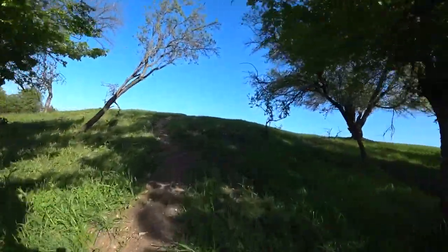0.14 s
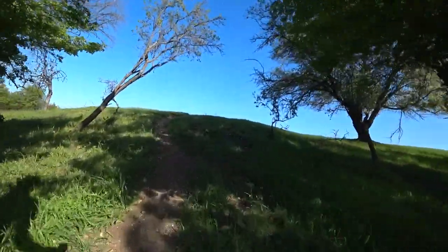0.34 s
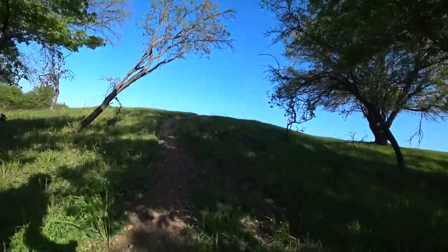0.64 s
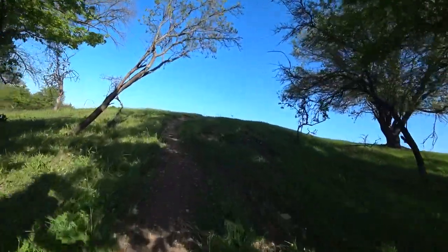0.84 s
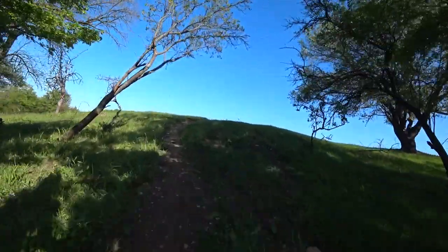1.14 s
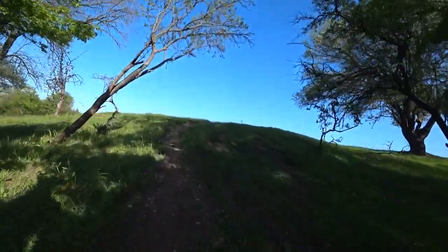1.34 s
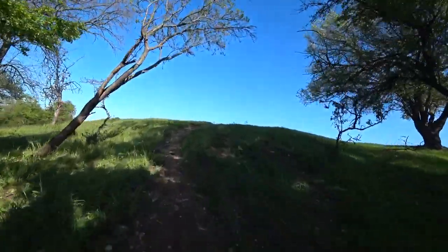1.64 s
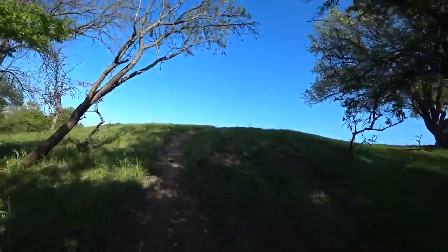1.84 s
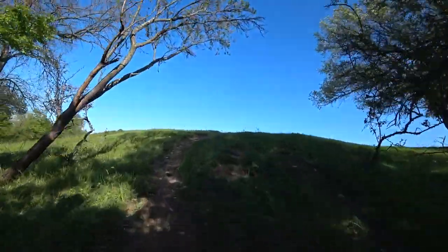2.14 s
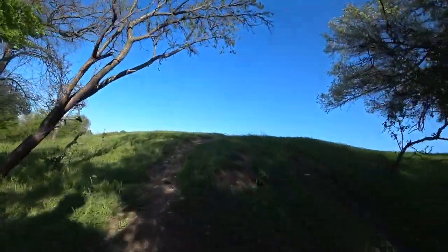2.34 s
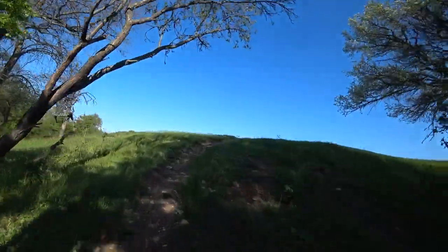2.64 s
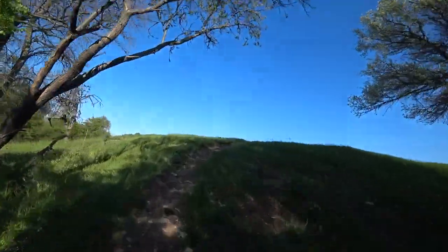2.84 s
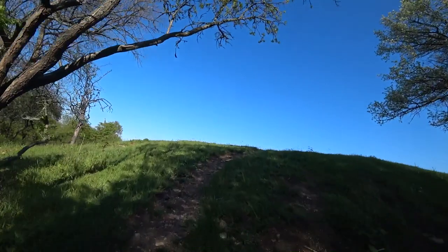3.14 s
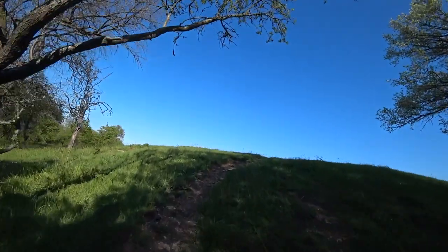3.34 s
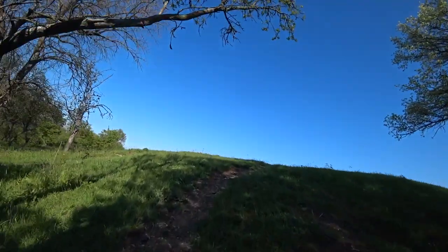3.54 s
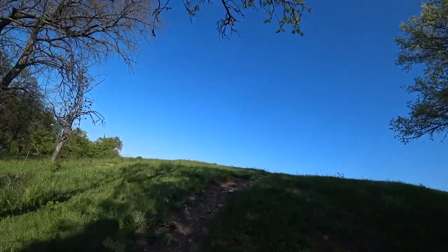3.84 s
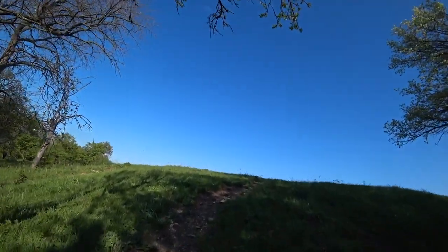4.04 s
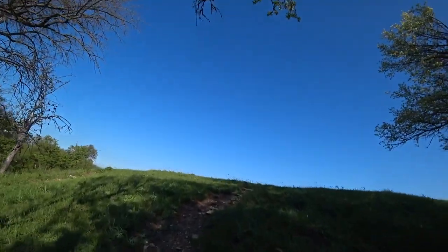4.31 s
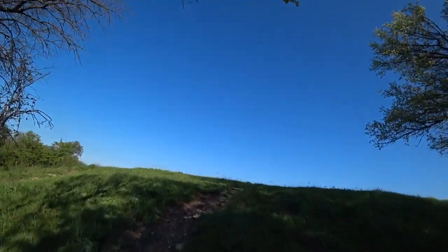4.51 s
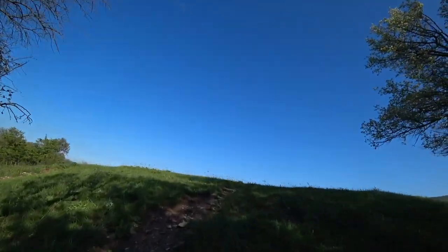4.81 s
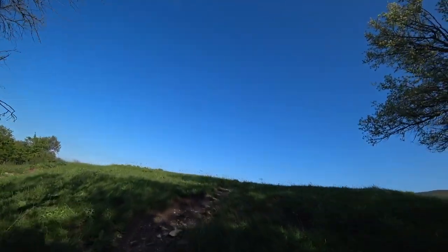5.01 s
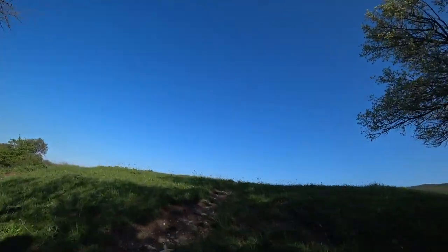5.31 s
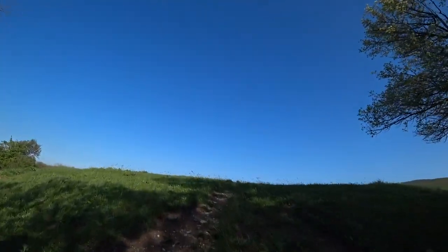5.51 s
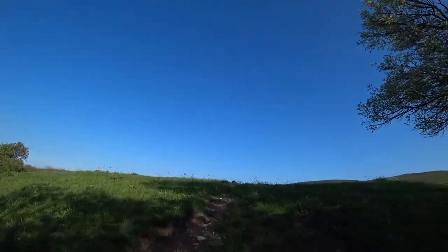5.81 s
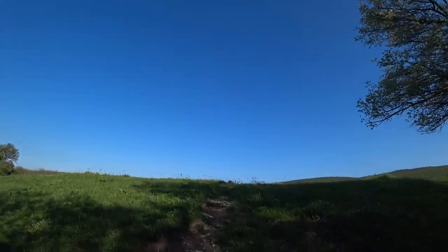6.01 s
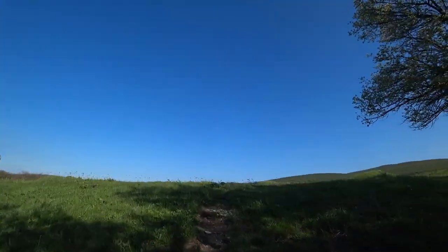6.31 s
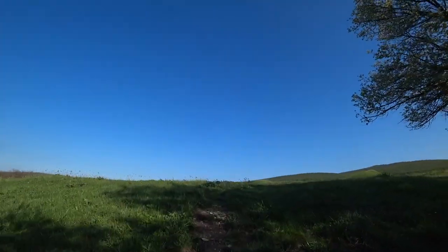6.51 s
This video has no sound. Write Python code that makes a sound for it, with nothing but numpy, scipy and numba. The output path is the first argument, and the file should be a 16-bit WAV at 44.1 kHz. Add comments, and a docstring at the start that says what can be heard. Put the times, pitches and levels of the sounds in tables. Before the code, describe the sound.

Close, quick footsteps crunch soil, grit and grass on an outdoor path, with dry twig and pebble snaps. Leaves and air hiss softly behind. After two seconds, uneven wind gusts buffet the small carried stereo microphone in dull, fluttering bursts, partly covering the steps and brief bird chirps. The wind weakens after five seconds, leaving crunches, clicks and faint chirping.

```python
"""On a dirt path between grass and trees, a runner carries a small stereo camera. Behind everything, leaves and
air are bands of noise that swell together and flicker alone. Birds are gliding tones; lone puffs and gusts at
the microphone ports are ringing pops and eddy noise. Twigs and pebbles snap as clicks rung through two
resonances. Footfalls crunch soil, grit and grass: random breaking grains, shaped by the weight that comes on
and eases off."""
import sys
import numpy as np
from scipy import signal
from scipy.fft import next_fast_len
from scipy.io import wavfile
from scipy.ndimage import uniform_filter1d
from numba import njit

SR = 44100
rng = np.random.default_rng(int(sys.argv[2]) if len(sys.argv) > 2 else 0)


def int16_out(signal):
    """Quantize to a 16-bit WAV file."""
    q = np.round(np.clip(np.atleast_2d(signal).T, -1, 1) * 32767)
    wavfile.write(sys.argv[1], SR, q.astype(np.int16))


N = 293706

# Relative spectral density of far leaves and air: pitch_hz, density_db
WOODS_SPECTRUM = [(25, -16), (138, -5.5), (269, -6.5), (298, -7), (385, -21), (472, 0), (609, 1), (893, 1),
                  (1500, 3), (2500, -5), (4100, -6.5), (5210, -8.5), (10100, -21.5), (11200, -57)]
# Correlation of the leaves between left and right: pitch_hz, likeness_0_to_1
WOODS_LIKENESS = [(60, 1), (300, 0.57), (2500, 0.13), (6000, 0.52)]
# Bird whistles, before waver and flutter: start_s, length_s, first_hz, last_hz, level_db
WHISTLES = [(1.732, 0.1, 4920, 4570, -67), (2.686, 0.12, 4220, 2840, -51), (2.873, 0.034, 3700, 3700, -65),
            (2.939, 0.025, 3730, 3680, -64), (3.068, 0.016, 3120, 3130, -43),
            (3.094, 0.016, 5080, 2320, -46), (3.261, 0.044, 2270, 2060, -54.5),
            (3.344, 0.013, 4820, 7300, -55), (3.351, 0.0059, 4330, 6040, -45.5),
            (3.4, 0.0079, 5330, 7800, -64), (3.401, 0.0086, 4680, 6550, -49.5),
            (3.467, 0.012, 3130, 2020, -53), (3.547, 0.013, 3840, 5460, -54.5),
            (3.555, 0.011, 4020, 3910, -46), (3.568, 0.0113, 3830, 3020, -51),
            (3.569, 0.033, 3010, 3390, -46), (3.603, 0.017, 3000, 2050, -54),
            (3.72, 0.028, 6800, 7100, -57.5), (3.756, 0.029, 6950, 6770, -59),
            (6.225, 0.028, 2320, 2500, -60), (6.343, 0.061, 2470, 2570, -66),
            (6.604, 0.042, 2530, 2450, -56)]
# A second bird's throbbing, falling chirps, before throb and fade: start_s, length_s, level_db
CHIRP_CALLS = [(6.303, 0.034, -52), (6.429, 0.044, -50.5), (6.56, 0.038, -58)]
# Lone puffs of air on the ports, nominal peaks: time_s, peak_db
AIR_PUFFS = [(0.925, -54.5), (1.61, -56), (1.744, -54), (1.781, -48.5)]
# Mean strength of the wind on the ports, before flutter: time_s, level_db
GUST_STRENGTH = [(1.74, -77), (1.8, -54.5), (1.9, -49.5), (1.97, -39.5), (2.0, -37), (2.06, -38.5),
                 (2.145, -39), (2.2, -48), (2.235, -42.5), (2.255, -35), (2.305, -39), (2.345, -31.5),
                 (2.368, -39), (2.4, -33), (2.47, -38.5), (2.594, -44.5), (2.645, -38.5), (2.665, -31),
                 (2.7, -34), (2.78, -51.5), (2.82, -47.5), (2.888, -39.5), (2.975, -46.5), (3.005, -39.5),
                 (3.07, -38.5), (3.165, -43.5), (3.21, -31), (3.225, -37), (3.25, -35.5), (3.265, -43.5),
                 (3.325, -41.5), (3.385, -46), (3.405, -35.5), (3.435, -37), (3.462, -38.5), (3.55, -42),
                 (3.68, -43), (3.79, -46), (4.27, -54.5), (4.33, -40), (4.375, -48.5), (4.445, -38.5),
                 (4.49, -40.5), (4.56, -34.5), (4.61, -40), (4.7, -42.5), (4.755, -48.5), (4.88, -47),
                 (4.92, -41), (4.99, -42.5), (5.04, -54), (5.13, -47.5), (5.19, -58), (5.28, -44),
                 (5.448, -64), (5.6, -54), (5.76, -74), (5.84, -49.5), (5.89, -50.5), (6.2, -53.5),
                 (6.321, -69), (6.66, -52.5)]
# Mean strength of the low thumps under the gusts, before flutter: time_s, level_db
THUMP_STRENGTH = [(1.72, -94), (1.85, -62), (2.1, -64.5), (2.6, -52), (3.1, -65.5), (3.75, -49.5),
                  (4.58, -63.5), (4.67, -40.5), (4.76, -62), (6.66, -66)]
# Snapping twigs and pebbles, peaks before panning:
# time_s, crack_peak_db, crack_pitch_hz, knock_peak_db, left_minus_right_db
TWIG_SNAPS = [(0.121, -48, 3000, -48, 2), (0.153, -39, 2500, -34.5, 2), (0.195, -53, 2500, -45, 5),
              (0.2296, -53, 2400, -38, 4), (0.2731, -36, 3060, -35.5, 2), (0.525, -39, 4400, -81, 3),
              (1.078, -34.5, 3750, -58, 2), (1.139, -42, 3310, -67, 1), (1.3593, -45, 2500, -42, 2),
              (1.403, -65, 2030, -31, 4), (1.413, -55, 2500, -42, 0), (1.61, -47, 6100, -47, 4),
              (1.895, -57, 3340, -25, 1.5), (2.019, -31, 2400, -44, 3.5), (2.0998, -39, 3840, -50, 1),
              (2.532, -39, 2500, -34, 2), (2.829, -39.5, 4970, -42.5, 3), (2.985, -33, 5800, -37, 5),
              (3.128, -57, 2200, -35, 2), (3.949, -25, 5570, -47, 4), (3.965, -38, 5000, -42, 8),
              (4.1045, -29, 6330, -34, -13.5), (4.167, -57, 2200, -38.5, 3), (4.2127, -50, 2200, -33, 5),
              (4.2137, -30, 5460, -44, 0), (4.2149, -17, 5460, -26, 1.5), (4.215, -26, 7060, -47, 3),
              (4.2232, -32, 4800, -37, 6), (4.2517, -23, 8150, -28.5, -11), (4.362, -49, 5000, -41.5, 2),
              (4.7914, -39, 2220, -34.5, 5), (4.824, -31.5, 4770, -32.5, 2), (4.8534, -36, 2260, -32.5, 4),
              (5.1579, -20.5, 2640, -28.5, 3), (5.3504, -38, 2050, -48, 5), (5.3622, -53, 2350, -28.5, 4),
              (5.4088, -38.5, 2040, -39.5, 5), (5.5, -43, 2600, -45, 2), (5.68, -34.5, 4550, -40, -1),
              (5.709, -37.5, 2090, -62, 2), (5.9227, -56, 2200, -35, 0), (5.93, -36, 3040, -25.5, 3),
              (5.9763, -39, 2540, -37, 1), (6.049, -41.5, 4000, -59, 0), (6.4995, -45, 3500, -37, 1.5),
              (6.5298, -44, 4200, -26, 2), (6.6202, -36, 4260, -59, 1), (6.636, -32, 3400, -42, 1.5),
              (6.64, -30, 3240, -59, 1.5)]
# Feet on the ground, some dragging, before stick and slip:
# start_s, time_scale_s, grit_level_db, brightness_db_per_octave
FOOTFALLS = [(-0.03, 0.15, -55, 3), (0.079, 0.077, -55.5, 0), (0.12, 0.052, -58.5, -1),
             (0.207, 0.05, -57.5, -0.5), (0.27, 0.056, -67.5, 4), (0.521, 0.035, -53.5, 5.5),
             (0.751, 0.038, -54, -6), (1.075, 0.02, -59, -1.5), (1.366, 0.036, -52, -5),
             (1.435, 0.065, -64, -3.5), (1.657, 0.062, -65, -6), (1.88, 0.06, -53.5, -3),
             (2.12, 0.051, -63, 6), (2.454, 0.086, -51.5, -5), (2.979, 0.025, -55, 13.5),
             (2.986, 0.12, -54, -3), (3.608, 0.075, -57.5, -6.5), (3.938, 0.025, -52.5, 7.5),
             (4.081, 0.058, -64, 12), (4.201, 0.059, -49.5, -2.5), (4.422, 0.17, -66.5, 2),
             (4.754, 0.13, -56.5, -1.5), (5.12, 0.12, -63.5, 13.5), (5.334, 0.058, -54.5, -3.5),
             (5.58, 0.076, -60, -0.5), (5.662, 0.12, -58, 2), (5.915, 0.056, -58, -7.5),
             (6.029, 0.037, -61.5, -1), (6.476, 0.047, -50.5, -5.5), (6.534, 0.064, -60.5, -5),
             (6.6, 0.08, -61.5, -3)]

WOODS_RMS_DB = -60
GLIDE_BEND_PER_S = 5.3  # the longer a whistle, the more it lingers on its first pitch, then glides ever faster
CHIRP_HZ, CHIRP_FALL_HZ, CHIRP_BEND = 5250, 1900, 3.0
CHIRP_THROB_HZ, CHIRP_THROB_SHARE, CHIRP_FADE_DB = 165, .6, 12
# Gusts stronger than the reference shed smaller, higher eddies
EDDY_HZ, EDDY_REF_DB, EDDY_OCT_PER_DB = 534, -41.5, 0.082
# As the air slows the eddies grow and their pitch sinks: start, rate, greatest depth
EDDY_SAG_FROM_S, EDDY_SAG_OCT_PER_S, EDDY_SAG_OCT = 3.86, 0.42, 0.11
PORT_HZ = 1275  # low-pass corner of the port opening
PORT_TURN_RAD = 2.15  # phase the stereo matrix puts between left and right for wind entering one port
# What crushed ground rings with: centre and width
SOIL_HZ, SOIL_WIDTH_HZ = 1150., 1000.
GRIT_HZ, GRIT_WIDTH_HZ = 3500., 3400.
GRASS_HZ, GRASS_WIDTH_HZ = 6500., 4200.
GRASS_DB = -5  # offset of the swish from the slope through soil and grit
# Shares of a step's time scale: weight coming on, then the e-fold time of crumbling away
PRESS_SHARE, CRUMBLE_SHARE = 0.41, 0.65
TOP_HZ = 11250
SIDES = np.array([[1], [-1]])  # left, right


def undb(db):
    """Decibel definition: amplitude ratio from a level."""
    return 10 ** (np.asarray(db) / 20)


def level(x, db):
    """Root-mean-square normalisation to a given level."""
    return x * undb(db) / np.sqrt(np.mean(x ** 2))


def noise():
    """White noise: independent normal samples of unit power."""
    return rng.standard_normal(N)


@njit
def svf(x, hz, damp):
    """State-variable resonance: band-pass of moving centre, gain 1 there; damp = width over centre."""
    y, band_state, low_state = np.empty(len(x)), 0., 0.
    for i in range(len(x)):
        g = np.tan(np.pi * hz[i] / SR)
        v = (band_state + g * (x[i] - low_state)) / (1 + g * (g + damp))
        band_state = 2 * v - band_state
        low_state = low_state + 2 * g * v
        y[i] = damp * v
    return y


def moving_band(x, hz, damp):
    """Cascaded resonance: two equal band-passes in series steepen the skirts."""
    return svf(svf(x, hz, damp), hz, damp)


def band(x, hz, width_hz):
    """Fixed cascaded resonance, set by its centre and the width of each stage."""
    return moving_band(x, np.full(len(x), float(hz)), width_hz / hz)


def walk(rate):
    """Slewed random process: levels held 1 / rate s and averaged twice, spread near 1."""
    hold = int(SR / rate)
    steps = np.repeat(rng.standard_normal(N // hold + 1), hold)
    slewed = uniform_filter1d(uniform_filter1d(steps, hold), hold)
    return slewed[:N] * np.sqrt(2)


def place(x, pan_db, wide):
    """Level-difference panning; an unlike share reaches each side by slightly later paths."""
    late = np.roll(x, 23) - np.roll(x, 61)
    return undb(SIDES * pan_db / 2) * x + wide * late * SIDES


def glide_tone(pitch_hz):
    """Frequency modulation: phase is the running sum of the instantaneous pitch."""
    return np.sin(2 * np.pi * np.cumsum(pitch_hz) / SR)


def grains(per_s, spread_db):
    """Random impulse process of breaking particles: most small, a few large."""
    when, sign, size = rng.random(N), rng.standard_normal(N), rng.exponential(1, N)
    return (when < per_s / SR) * sign * undb(np.minimum(spread_db * size, 16))


def woods():
    """Superposed band noise of far leaves and air: half-octave bands swell together and flicker alone."""
    leaves, swell = 0, walk(4.46)
    spectrum_hz, spectrum_db = np.transpose(WOODS_SPECTRUM)
    likeness_hz, likeness = np.transpose(WOODS_LIKENESS)
    for hz in 21 * 2 ** np.arange(0, 9.3, .5):
        mid = band(noise(), hz, hz * .7)
        side = band(noise(), hz, hz * .7)
        db = np.interp(np.log(hz), np.log(spectrum_hz), spectrum_db)
        db = db + .7 * swell + 2.2 * walk(9)
        alike = np.clip(np.interp(np.log(hz), np.log(likeness_hz), likeness), 0, 1)
        leaves = leaves + undb(db) * (np.sqrt(1 + alike) * mid + np.sqrt(1 - alike) * side * SIDES)
    # a thin wavering hiss high in the treble
    hiss = np.array([band(noise(), 9840.0, 1400.0) for _ in range(2)])
    hiss = level(hiss, -76.5) * undb(0.43 * walk(11.0))
    return level(leaves, WOODS_RMS_DB) * undb(0.4 * SIDES) + hiss


def birds():
    """Frequency-modulated whistles, slightly unsteady, trailed by a faint smear scattered from the trees."""
    calls, waver, flutter = np.zeros(N), 0.014 * walk(500), undb(2.5 * walk(250))
    for start, length, first_hz, last_hz, db in WHISTLES:
        u = np.arange(0, 1, 1 / (length * SR))  # share of the call elapsed
        i = int(start * SR)
        pitch = first_hz + (last_hz - first_hz) * u ** (1 + GLIDE_BEND_PER_S * length)
        steadiness = min(1, (0.038 / length) ** 2)  # long whistles are held steady
        pitch = pitch * (1 + waver[i:i + len(u)] * steadiness)
        calls[i:i + len(u)] += undb(db) * np.sin(np.pi * u) ** 0.38 * glide_tone(pitch)
    for start, length, db in CHIRP_CALLS:
        u = np.arange(0, 1, 1 / (length * SR))
        i, fall = int(start * SR), u ** CHIRP_BEND
        throb = 1 - CHIRP_THROB_SHARE * np.cos(2 * np.pi * CHIRP_THROB_HZ * u * length)
        pitch = (CHIRP_HZ - CHIRP_FALL_HZ * fall) * (1 + waver[i:i + len(u)])
        envelope = undb(db - CHIRP_FADE_DB * fall) * throb * np.sin(np.pi * u) ** 0.76
        calls[i:i + len(u)] += envelope * glide_tone(pitch)
    t = np.arange(int(.15 * SR)) / SR
    trees = rng.standard_normal((2, len(t))) * np.exp(-t / 0.05) * undb(-39)
    smear = signal.fftconvolve(calls[None], trees, axes=1)[:, :N]
    return place(calls * flutter, 7.3, 0.043) + smear


def puffs():
    """Impulse response of a damped resonance: each puff is a dull pop of two or three cycles."""
    impulses = np.zeros(N)
    for s, db in AIR_PUFFS:
        impulses[int(s * SR)] = undb(db)
    pop = band(impulses, 253.0, 250.0)
    return place(pop * impulses.max() / np.abs(pop).max(), 1.0, 0.1)


def wind():
    """Eddy shedding at the ports: noise round a wandering pitch, in quick puffs, over lower thumps."""
    t = np.arange(N) / SR
    gust_db = np.interp(t, *np.transpose(GUST_STRENGTH))
    thump_db = np.interp(t, *np.transpose(THUMP_STRENGTH))
    hz = EDDY_HZ * 2 ** (EDDY_OCT_PER_DB * np.maximum(gust_db - EDDY_REF_DB, 0))
    hz = hz * 2 ** -np.clip(EDDY_SAG_OCT_PER_S * (t - EDDY_SAG_FROM_S), 0, EDDY_SAG_OCT)
    hz = hz * np.exp(0.099 * walk(24.85))
    gust_db = gust_db + 1.5 * np.tanh(walk(40))  # the air flutters about its mean strength

    small = level(moving_band(noise(), hz, 1.3), -1.97)
    small = small * undb(4.7 * np.tanh(walk(90)))
    large = level(moving_band(noise(), 0.69 * hz, 0.85), -4.5)
    large = large * undb(5.9 * np.tanh(walk(60)))
    eddy = (small + large) * undb(gust_db)
    # eddies smaller than the port opening cancel out
    eddy = signal.sosfilt(signal.butter(5, PORT_HZ, fs=SR, output="sos"), eddy)
    analytic = signal.hilbert(eddy, next_fast_len(N))[:N]
    port = np.real(analytic * np.exp(-.5j * PORT_TURN_RAD * SIDES))

    # lower eddies are independent on the two sides; thumps are partly alike
    lower = np.array([level(moving_band(noise(), 0.52 * hz, 1.44), -7.0) for _ in range(2)])
    mid = level(band(noise(), 124.0, 266.0), 0)
    side = level(band(noise(), 175.0, 220.0), -1.5)
    thump = undb(thump_db + 4.5 * np.tanh(walk(15))) * (mid + side * SIDES)
    return port * undb(0.4 * SIDES) + undb(gust_db) * lower + thump


def snaps():
    """Impulsive excitation: a click with a few ms of splinters rings a crack and a knock resonance."""
    out, t = np.zeros((2, N)), np.arange(int(.012 * SR)) / SR
    for s, crack_db, crack_hz, knock_db, pan_db in TWIG_SNAPS:
        push = rng.standard_normal(len(t)) * 0.1 * np.exp(-t / 0.0014)
        push[0] += 1
        crack = band(push, crack_hz, 0.9 * crack_hz)
        knock = band(uniform_filter1d(push, size=9), 1130.0, 1290.0)
        snap = undb(crack_db) * crack / np.abs(crack).max()
        snap = snap + undb(knock_db) * knock / np.abs(knock).max()
        i = int(s * SR)
        out[:, i:i + len(t)] += place(snap, pan_db, 0.091)[:, :N - i]
    return out


def feet():
    """Granular fracture: soil, grit and grass break in grains as weight comes on fast and eases off."""
    weight, t = np.zeros((3, N)), np.arange(N) / SR
    octaves = np.log2(np.array([SOIL_HZ, GRIT_HZ, GRASS_HZ]) / GRIT_HZ)
    for start, length, db, bright in FOOTFALLS:
        on = slice(max(int(start * SR), 0), int((start + 4.8 * length) * SR))
        u = (t[on] - start) / length
        onset = np.sin(np.pi / 2 * np.clip(u / PRESS_SHARE, 0, 1)) ** 2
        crumble = np.exp(-(np.maximum(u - PRESS_SHARE, 0) / CRUMBLE_SHARE) ** 1.19)
        band_db = db + bright * octaves + [0, 0, GRASS_DB]
        weight[:, on] += undb(band_db)[:, None] * onset * crumble
    weight = weight * undb(2.2 * walk(180) - .4)  # the sole sticks and slips, so grains come in clusters

    shared = grains(450, 0.74)  # large clods sound in every band at once
    soil = level(band(shared + 0.98 * grains(2000, 0.93), SOIL_HZ, SOIL_WIDTH_HZ), 0)
    grit = level(band(shared + 0.44 * grains(2500, 4.2), GRIT_HZ, GRIT_WIDTH_HZ), 0)
    grass = level(band(.5 * shared + 4.3 * grains(6000, 4.0), GRASS_HZ, GRASS_WIDTH_HZ), 0)
    # loose grit rattles faintly throughout, heard between the steps
    stray = level(band(grains(300, 1.8), 4000., 4500.), -76)
    crunch = (weight * [soil, grit, grass]).sum(axis=0)
    return place(crunch + stray, 2.0, 0.16)


def scene():
    """Linear superposition of all sources."""
    return woods() + birds() + puffs() + wind() + snaps() + feet()


def record(dry):
    """Band limitation: the camera cuts the top steeply, here by an elliptic low-pass."""
    return signal.sosfilt(signal.ellip(10, .2, 75, TOP_HZ, fs=SR, output="sos"), dry)


dry = scene()
out = record(dry)
int16_out(out)
```